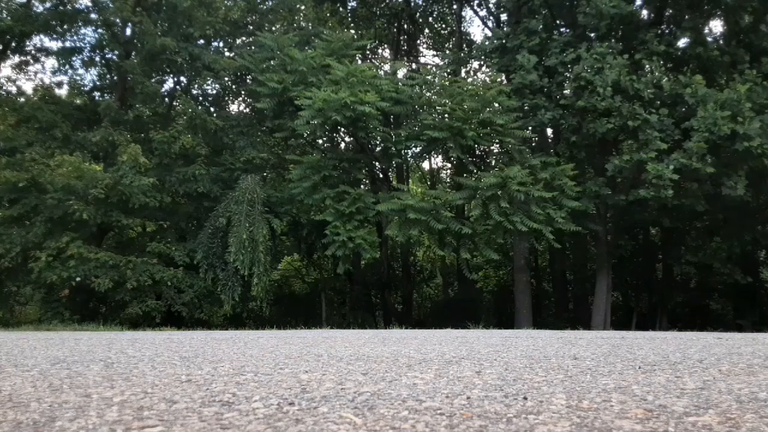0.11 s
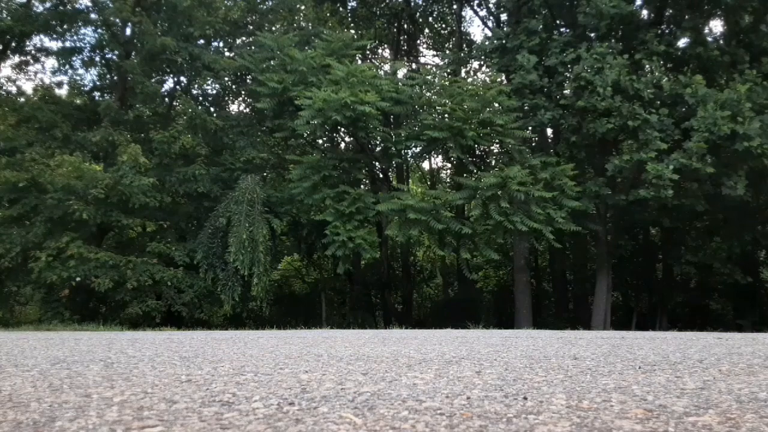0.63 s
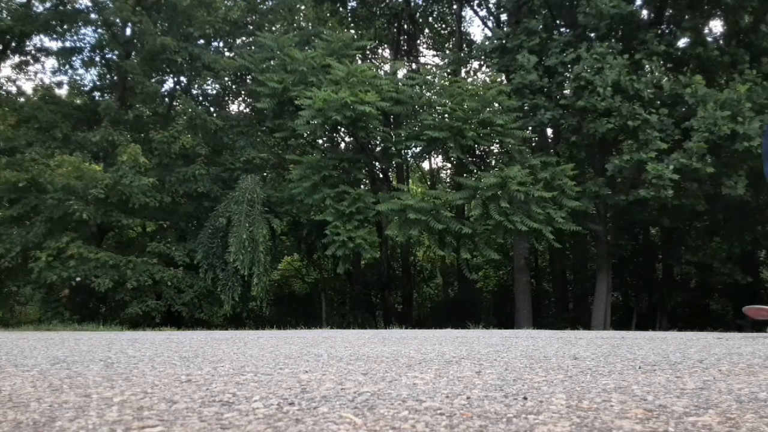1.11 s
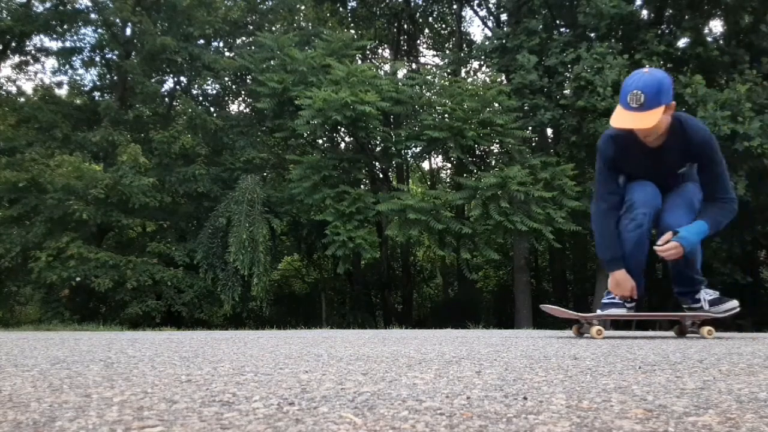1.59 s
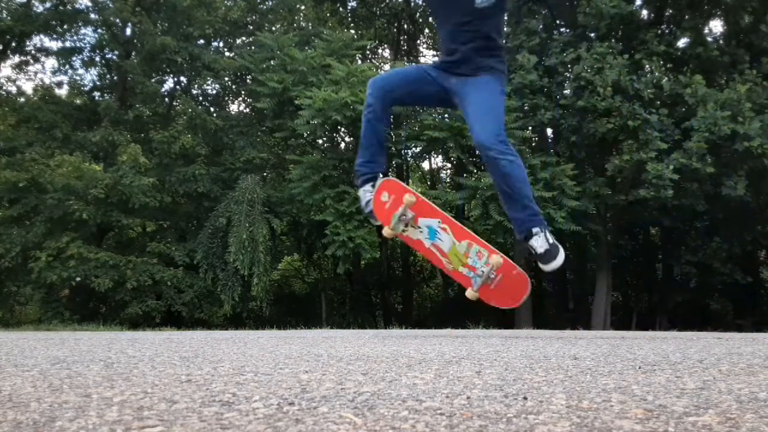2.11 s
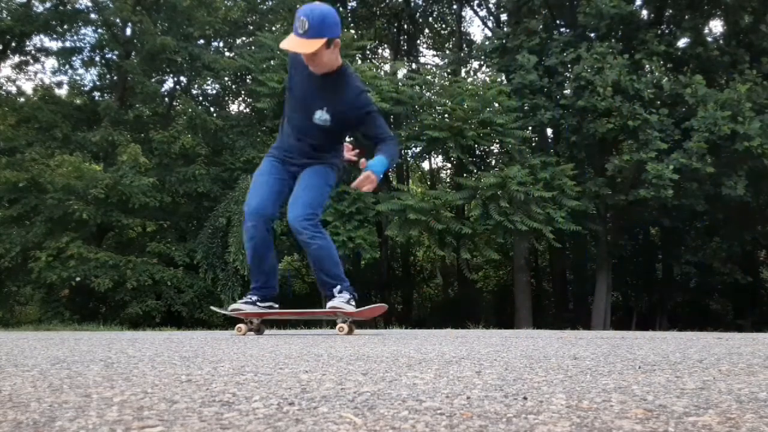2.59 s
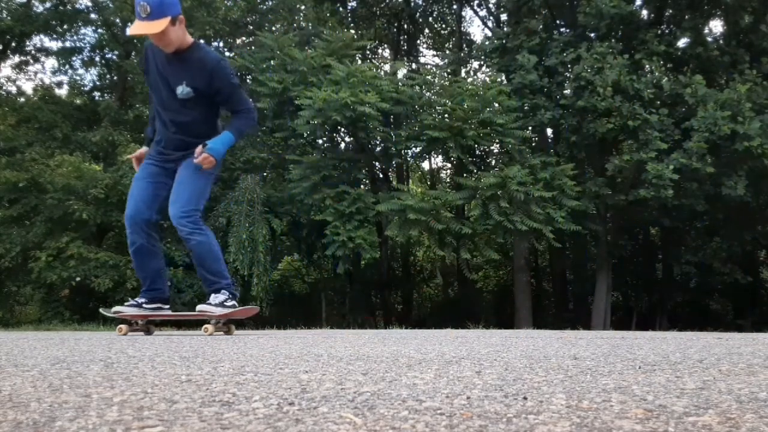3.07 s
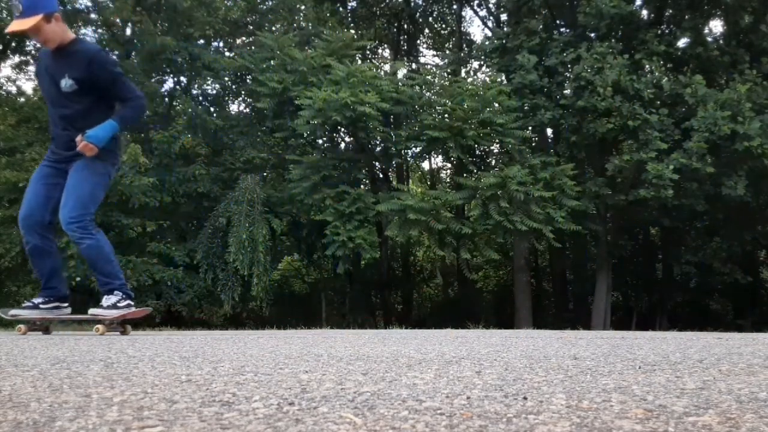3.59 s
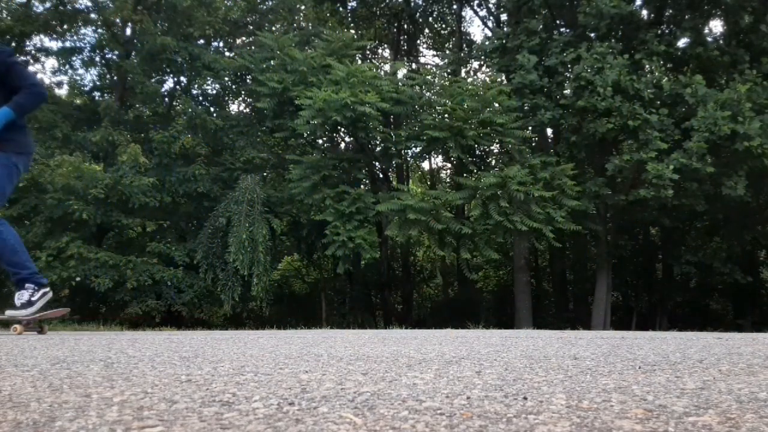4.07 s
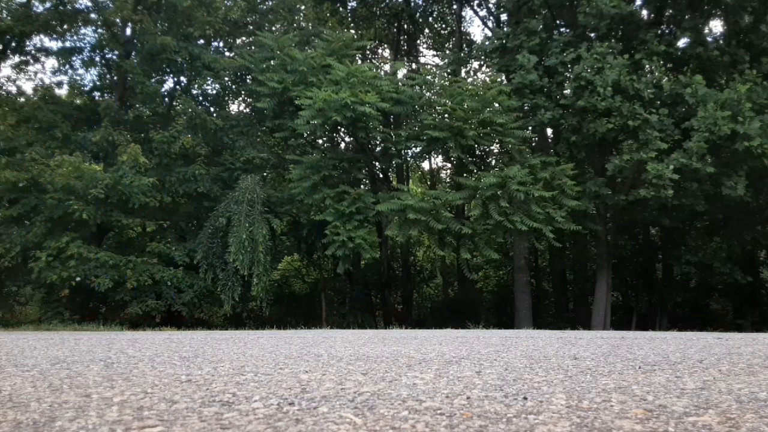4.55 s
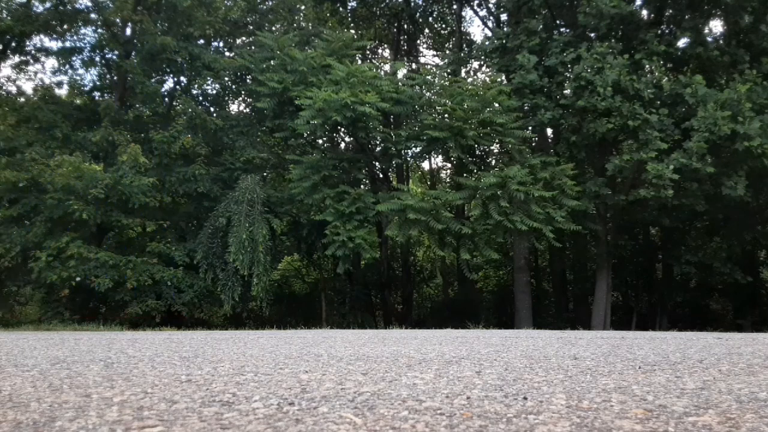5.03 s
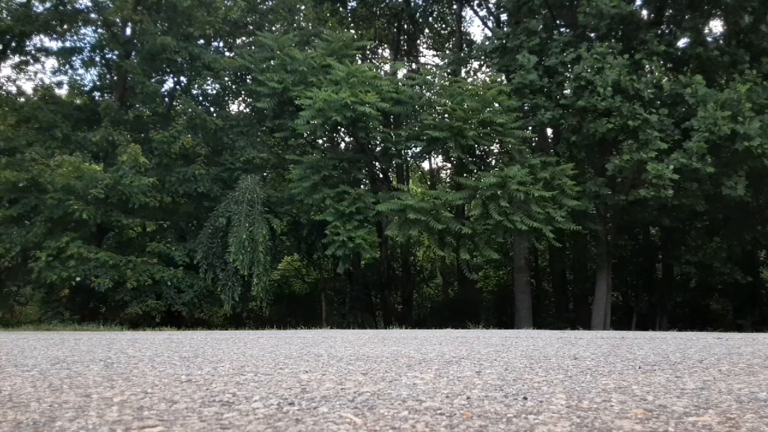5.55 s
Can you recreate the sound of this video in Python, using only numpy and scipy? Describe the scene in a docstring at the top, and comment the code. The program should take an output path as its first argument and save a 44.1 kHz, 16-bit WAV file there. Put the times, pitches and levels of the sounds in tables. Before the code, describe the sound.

A skateboard rattles in over coarse asphalt from the right, pops, is caught and lands with hard wooden cracks, then rolls away left.

```python
"""A skateboard rolls from right to left over coarse asphalt; traffic drone, leaf hiss and a low hum lie below.
Stones shake wheels, deck, trucks and bearings: noise and clicks drive resonances; a loose washer ticks.
Then shoes scuff, the tail pops (decaying deck modes and noise), the board is caught and lands with a push
of air, a short squeak follows, and the board rolls away to the left.
Two microphone ports a hand apart hear it: lag and colour follow the bearing; trees echo it."""
import sys
import numpy as np
from scipy import signal
from scipy.fft import rfft, irfft, next_fast_len
from scipy.io import wavfile
from scipy.ndimage import map_coordinates

SR = 44100
rng = np.random.default_rng(int(sys.argv[2]) if len(sys.argv) > 2 else 0)


def output_pcm(signal):
    """Save a mono or channel-first signal as 16-bit PCM at the path in sys.argv[1].

    Samples are clipped to [-1, 1] before scaling.
    """
    pcm = np.clip(np.atleast_2d(signal).T, -1, 1) * 32767
    wavfile.write(sys.argv[1], SR, np.round(pcm).astype(np.int16))


def boost_factor(decibels):
    """Convert a level in decibels to a linear amplitude factor."""
    exponent = np.asarray(decibels, float) / 20
    return 10 ** exponent


N = 249606

# Wheels on the road: (time [s], shaking [dB], weight on the deck [dB], washer play over shaking [dB])
ROAD = [(0, -28, 9.5, -8), (.2, -38, 11, -3.5), (.3, -39, 10, 3), (.34, -33, 4, 11), (.9, -28.5, 1, -4),
        (1.25, -24.5, 1, -29), (1.4, -30, 5.5, 0), (1.5, -30, 7.5, -6), (1.58, -28.5, 1.5, -4),
        (1.62, -32, 6, -7), (1.8, -30, 5.5, 3.5), (1.95, -33.5, 15, 27.5), (2.03, -50.5, 5, 28),
        (2.12, -48, 15, -26), (2.5, -54, 7, -34), (2.56, -44, 3, -25), (2.72, -39.5, 2.5, -25),
        (2.97, -46, 2.5, -7), (3.6, -48, -4, -15), (3.9, -43, -6, -19), (4, -52, 4, -5),
        (4.04, -41, -10, -3), (4.2, -42, -3, 3), (4.4, -38.5, 5.5, -12), (4.75, -35.5, 1.5, 11),
        (5, -33, 5, 10), (5.15, -33.5, 6, -12), (5.25, -35, 4, -9), (5.66, -37, 0.5, -9)]
# Coarser stretches of road: (middle [s], length [s], extra shaking [dB])
COARSE_PATCHES = [(.45, 0.23, 3), (1.002, 0.35, 2.5), (1.31, .1, 2.5), (1.551, 0.12, 2.5),
                  (1.927, 0.25, 8.5), (4.231, 0.099, 7.5), (4.353, 0.21, 6.5), (4.52, 0.3, 6),
                  (4.725, 0.19, 4.5), (4.939, 0.38, 4.5), (5.145, 0.084, 4.5)]
# Bearing of the board: (time [s], lag of the left port [ms])
BEARING = [(0, 0.38), (.8, 0.34), (1.4, 0.23), (1.9, 0.13), (2.4, -0.017), (3, -0.12), (3.8, -0.19),
           (4.6, -0.25), (5.66, -0.36)]
# Loaded deck favours its upper bending resonances: (time [s], tilt [dB])
LOAD_TILT = [(0, -8.5), (1, -12), (1.2, 2), (1.35, 9), (1.55, 13.5), (1.75, 1), (1.93, -0.5), (2.4, 0),
             (2.8, -3), (3.6, -6), (4.3, -0.5), (4.9, 6), (5.66, -3)]

# Resonances of the board: (centre [Hz], width [Hz], level coming [dB], level going [dB])
RUMBLE_MODES = [(119.8, 21.7, 7, 3.5), (184, 99, 3, -1), (303, 127, -2, 1.5)]
BENDING_MODES = [(499, 101, -1.5, -3), (573, 46.5, 4.5, 4.5), (641, 111, 0.5, 0.5), (790, 136, -3, 0),
                 (860, 71, -3.5, -0.5)]
RINGING_MODES = [(963, 145, 6, 3.5), (1166, 192, 9.5, 6), (1313, 344, 7, 3), (1667, 460, 5.5, -0.5),
                 (1910, 370, 1, -4.5)]
RATTLE_MODES = [(2103, 384, -0.5, 3.5), (2614, 870, -1.5, 3), (3304, 910, -0.5, 2.5), (4250, 814, 1.5, 3.5),
                (4814, 1060, -1, 1.5), (5990, 1290, -3.5, -1), (7540, 1550, -7, -2.5), (8390, 800, -13, -4)]
HISS_MODES = [(8100, 4900, -10.5, -3.5), (10960, 500, -2, 4.5), (13100, 4200, -6, -2),
              (15900, 360, -3, -16)]
WASHER_MODES = [(3650, 470, -47, -6), (4290, 300, 3, -3), (5080, 360, -0.5, -1.5), (5370, 400, -3, -1.5),
                (5800, 320, -7.5, -2.5), (6750, 610, -23, -7)]
BEARING_MODES = [(6160, 500, -3, -6), (7500, 1500, 3, 5)]

# One value per part (rumble, bending, ringing, rattle, hiss): level against the shaking [dB]
PARTS_COMING_DB = [-1.5, 1, -6, 2.5, -6.5]
PARTS_GOING_DB = [-1, -3, -3, 0.5, -8.5]
# Same parts: share of the weight, coarse-stretch and tilt decibels that each follows [dB/dB]
WEIGHT_SHARE = [0.38, 0.64, 0.24, 0, 0.0053]
PATCH_SHARE = [0.36, 0.89, 1.4, 1.47, 1.1]
TILT_SHARE = [-0.06, 0.24, 0.15, 0.024, 0.19]
# Same parts: level against the scuff [dB]
SCUFF_PARTS_DB = [-8.5, -36, -10.5, 1.5, -10]

# A wheel strikes a large stone: (time [s], crack [dB], deck [dB])
JOLTS = [(0.01, -23, -8.5), (0.3244, -22, -24), (0.418, -27, -10), (.44, -33, -9.5), (0.4737, -21, -9.5),
         (0.788, -20, -14), (0.9716, -39, -13), (1.012, -19, -13), (1.087, -15.5, -33), (1.163, -13.5, -3),
         (1.206, -12.5, -3.5), (1.2206, -30, -38), (1.315, -23, -3.5), (1.425, -19, -22), (1.5252, -26, -9),
         (1.699, -39, -9.5), (1.7367, -13.5, -19), (1.76, -33, -19), (1.839, -21, -11), (1.867, -16.5, -28),
         (1.911, -21, -1.5), (1.943, -29, -4), (2.6854, -38, -17), (2.811, -35, -21), (2.95, -44, -35),
         (3.14, -36, -28), (3.181, -37.5, -35), (3.294, -38.5, -29), (3.375, -38, -37), (3.445, -33, -41),
         (3.47, -38, -34), (3.54, -38, -44), (3.695, -30.5, -27), (3.77, -41, -40), (3.789, -37.5, -40),
         (3.846, -42, -37), (3.869, -32, -26), (4.184, -32, -30), (4.23, -37, -16), (4.273, -28, -21),
         (4.305, -29, -30), (4.342, -23, -8.5), (4.445, -43, -15), (4.5, -21, -11), (4.517, -22, -10.5),
         (4.62, -22.5, -25), (4.675, -32, -13), (4.785, -22, -18), (4.8005, -24.5, -10.5),
         (4.848, -29, -15.5), (4.897, -22.5, -19), (5.032, -20.5, -16), (5.075, -21, -19), (5.22, -26, -25),
         (5.3235, -27, -24), (5.385, -26.5, -22)]
# Jolt on the deck: (bending against deck [dB], ringing against deck [dB])
JOLT_COMING_DB = [-10, -34]
JOLT_GOING_DB = [-15.5, -9]
# A wheel drops hard, one deck note: (time [s], start level [dB], pitch [Hz], t60 [s])
THUDS = [(0.01, -17.5, 597, 0.04), (0.437, -13, 500, 0.016), (0.474, -12.5, 580, 0.017),
         (0.788, -15, 600, 0.032), (1.01, -14.5, 600, 0.035), (1.091, -15, 510, 0.025),
         (1.163, -16, 484, 0.033), (1.209, -24, 620, 0.021), (1.251, -20, 510, 0.042),
         (1.315, -13.5, 765, 0.03), (1.525, -7.5, 790, 0.016), (1.564, -22, 754, 0.025),
         (1.748, -18, 588, 0.094), (1.836, -7, 596, 0.064), (1.908, -9, 505, 0.03),
         (1.942, -6.5, 531, 0.049), (4.229, -25, 910, 0.043), (4.308, -21, 1200, 0.023),
         (4.345, -17, 1050, 0.018), (4.4458, -27, 1110, 0.021), (4.495, -23, 408, 0.053),
         (4.62, -20, 1020, 0.025), (4.675, -25, 900, 0.022), (4.786, -20, 1080, 0.046),
         (4.799, -22, 675, 0.034), (4.911, -19, 674, 0.035), (5.032, -22, 409, 0.028),
         (5.219, -33, 433, 0.025), (5.322, -34, 353, 0.025), (5.383, -22.5, 735, 0.032)]
# Notes of the deck under small stones: (pitch [Hz])
KNOCK_HZ = [330, 480, 620, 800, 1050, 1250]
# Spinning bearings: (time [s], level [dB])
SIZZLE = [(0, -63), (.3, -63), (1.9, -47), (2.1, -75), (2.5, -80), (2.6, -54), (3, -56), (3.8, -58),
          (4.2, -63), (5.66, -60)]
# Clearest ticks of the washer: (time [s], start level [dB])
CLEAR_TICKS = [(1.341, -25), (1.3877, -30), (1.3992, -22.5), (1.4256, -27), (1.4431, -25), (1.4555, -23),
               (1.47, -29), (1.4925, -30), (1.5114, -26), (1.5404, -26), (1.5614, -23), (1.602, -23),
               (1.618, -20.5), (1.6314, -31), (1.6465, -22), (1.6744, -23.5), (1.686, -32), (1.703, -22.5),
               (1.7144, -39), (1.7579, -19), (1.784, -24), (1.8233, -25), (1.8487, -17), (1.9455, -13),
               (1.958, -14), (1.9884, -24), (1.9994, -20), (4.024, -29.5), (4.047, -33), (4.0646, -27),
               (4.077, -30), (4.0894, -42), (4.1061, -33), (4.121, -27), (4.131, -25.5), (4.1664, -43),
               (4.1844, -32), (4.1984, -32), (4.214, -28), (4.2244, -29), (4.237, -24), (4.2647, -34),
               (4.2727, -28), (4.285, -25), (4.2964, -28), (4.3061, -27), (4.3241, -22), (4.338, -25)]
# Shoes drag over the grip tape: (start [s], end [s], level [dB])
SCUFFS = [(1.953, 2.121, -31), (2.126, 2.173, -29.5), (2.18, 2.25, -46), (2.39, 2.539, -34),
          (2.544, 2.657, -34.5)]
# Tail pop, catch, landing: (time [s], crack [dB], deck bending [dB], deck ringing [dB], nominal t60 [s])
BLOWS = [(2.0672, -10.5, -23, -12.5, 0.077), (2.3907, -13, -23, -15, 0.025),
         (2.4112, -28, -25.5, -32, 0.064), (2.485, -8, -16, -20, 0.059), (2.49, -14.5, -24, -5, 0.025),
         (2.5121, -11, -11, -10, 0.033), (2.5223, -19, -26, -12, 0.016)]
# Clean strikes on the deck: (time [s], low group [dB], middle group [dB], high group [dB])
STRIKES = [(2.0664, -21, -14.5, -27), (2.0693, -19, -13.5, -19.5), (2.391, -12.5, -18.5, -17.5),
           (2.4105, -29, -36, -40), (2.426, -27, -39, -41), (2.4868, -14.5, -27, -20),
           (2.4906, -8.5, -14, -18), (2.5125, -7, -20, -23), (2.5205, -7, -18, -25)]
# Modes of the struck deck: (pitch [Hz], level in group [dB], t60 [s], group [index])
DECK_MODES = [(571, -2, 0.049, 0), (818, -3, 0.036, 0), (1050, -9, .05, 1), (1153, 0.5, .045, 1),
              (1670, -0.5, 0.028, 2), (1995, -4.5, 0.037, 2), (2510, -0.5, 0.021, 2)]

# Traffic and leaves, relative spectrum: (frequency [Hz], density [dB])
FAR_SPECTRUM = [(18, -52), (30, -30), (48, -42), (95, -2), (184, 4.5), (259, -2), (426, -6.5), (554, -14.5),
                (866, -14), (962, -18), (2170, -14), (12600, -74), (16000, -53.5)]
# Low hum: (time [s], pitch [Hz], level [dB])
HUM = [(0, 59, -50), (.8, 61.2, -47), (1.4, 61.1, -49), (2, 62, -55), (3, 63.8, -66), (5.66, 64, -60)]
# Echoes from the trees: (delay [s], level [dB])
TREES = [(0.023, -24), (0.052, -22.5), (0.087, -17.5), (0.129, -20.5), (0.172, -23)]
# Shading by the microphone body, board on the right / left: (frequency [Hz], left minus right [dB])
SHADE_COMING = [(60, -4), (110, 0), (200, 2.5), (380, 0), (700, 1.5), (1290, 5.5), (2380, 2), (4400, 1.5),
                (8120, -7.5), (15000, -2.5)]
SHADE_GOING = [(60, -7), (110, 1), (200, 1.5), (380, 1.5), (700, 4), (1290, 8.5), (2380, 5), (4400, 8.5),
               (8120, 6), (15000, -2)]
# The ports differ in build: (frequency [Hz], lead of the left port [rad])
PORT_LEAD = [(200, 0.15), (500, 0.3), (900, 0.6), (1400, 0.15), (2200, 0.3)]

FAR_BALANCE_DB, FAR_ALIKE_HZ = 3, 900  # left over right; ports alike below
AIR_DB, TRAFFIC_DB = -48.5, -50.5
THRUM_DB, THRUM_FOLLOWS = -46, 0.48  # level at mean shaking plus weight; share of its swing
SMOOTHER_GOING = .45  # share by which the stones even out as the board rolls away
GRIT_PER_S, GRIT_SPREAD_DB, GRIT_DB = 450, 6.0, -5.0  # level against the shaking
KNOCKS_PER_S, KNOCK_CYCLES = 110, 7.0  # cycles to fall 60 dB
KNOCK_COMING_DB, KNOCK_GOING_DB = -9, -8.5  # against the shaking
TICK_T60_S, TICK_SNAP_DB = .016, 13  # snap: first contact of a clear tick, above its rattle
JOLT_T60_S = 0.047
CHIP_DB, CHIP_HZ, CHIP_WIDTH_HZ = 3, 2400, 5100  # click of a jolt, against its crack
SCUFF_EDGE_S = 0.024
STRIKE_RISE_S = .0004
SNAP_DB, SNAP_T60_S = 0, 0.0056  # hard first contact of a blow, against its body
SLAM_S, SLAM_DB, SLAM_LENGTH_S = 2.516, -11.5, 0.0051
SQUEAK_S, SQUEAK_LENGTH_S, SQUEAK_DB = 2.628, .06, -36
SQUEAK_HZ, SQUEAK_WIDTH_HZ = 1620, 200


def rms_one(x):
    """Scales to rms 1."""
    return x / np.sqrt(np.mean(x ** 2) + 1e-20)


def in_time(rows):
    """Interpolates the columns of a table sample by sample."""
    s, *columns = np.transpose(rows)
    return [np.interp(np.arange(N) / SR, s, c) for c in columns]


def band(order, edge_hz, kind, x):
    """Butterworth filter."""
    return signal.sosfilt(signal.butter(order, edge_hz, kind, fs=SR, output="sos"), x)


def coloured(x, points, share=1, lead=0):
    """Applies a share of a smooth (Hz, dB) spectrum and a share of the port phase lead."""
    size = next_fast_len(N)
    log_hz = np.log(np.arange(size // 2 + 1) * SR / size + 1)
    hz, level_db = np.transpose(points)
    lead_hz, lead_rad = np.transpose(PORT_LEAD)
    gain = boost_factor(share * np.interp(log_hz, np.log(hz), level_db))
    turn = np.exp(1j * lead * np.interp(log_hz, np.log(lead_hz), lead_rad))
    return irfft(rfft(x, size) * gain * turn, size)[..., :N]


def fading(x, t60_s):
    """Each click leaves an envelope that falls 60 dB in t60_s."""
    return signal.lfilter([1], [1, -boost_factor(-60 / (t60_s * SR))], x + 1e-18)


def random_clicks(per_s, spread_db, limit):
    """Clicks at random times, of random sign and uneven size."""
    sizes = boost_factor(spread_db * np.minimum(rng.exponential(1, N), limit))
    return sizes * rng.choice([-1, 1], N) * (rng.random(N) < per_s / SR)


def stones(per_s, spread_db, t60_s, bed):
    """Random stones of uneven size over the even grain of the road; rms 1."""
    sizes = boost_factor(spread_db * np.minimum(rng.exponential(1, N), 2.5))
    hits = fading(sizes * (rng.random(N) < per_s / SR), t60_s)
    return rms_one(np.hypot(rms_one(hits), bed))


def three(alike):
    """White noise common to both ports, then one for each port's own share."""
    alike = np.clip(alike, 0, 1) * np.ones(N)
    return rng.standard_normal((3, N)) * np.sqrt([alike, 1 - alike, 1 - alike])


def body(force, modes, going, loose=0, tilt_db=0):
    """Parallel resonances, rms 1 for white force; levels follow the bearing, loose parts chatter apart."""
    out, power = 0, 0
    own = np.ones(N)
    if loose:
        own = rms_one(stones(per_s=110, spread_db=7.0, t60_s=0.072, bed=0.42) ** loose)
    for k, (hz, width_hz, coming_db, going_db) in enumerate(modes):
        r = np.exp(-np.pi * width_hz / SR)
        gain = boost_factor(coming_db) * (1 - going) + boost_factor(going_db) * going
        gain = gain * boost_factor(tilt_db * (k / len(modes) - .5))
        drive = force * np.roll(own, k * N // len(modes))
        poles = [1, -2 * r * np.cos(2 * np.pi * hz / SR), r * r]
        ring = signal.lfilter([(1 - r * r) / 2, 0, (r * r - 1) / 2], poles, drive)
        out = out + (-1) ** k * gain * ring
        power = power + gain ** 2 * (1 - r * r) / 2
    return out / np.sqrt(power)


def far_sides():
    """Gains that set the background louder on the left."""
    return boost_factor([[FAR_BALANCE_DB / 2], [-FAR_BALANCE_DB / 2]])


def far(shaking_db):
    """Noise as traffic drone, wheel thrum and leaf hiss, alike at both ports only in the bass."""
    common, *own = rng.standard_normal((3, N))
    air = band(1, FAR_ALIKE_HZ, "low", common) + band(1, FAR_ALIKE_HZ, "high", own)
    drone = band(2, [55, 92], "band", common)
    thrum = boost_factor(THRUM_DB + THRUM_FOLLOWS * (shaking_db - shaking_db.mean()))
    drone_level = np.hypot(boost_factor(TRAFFIC_DB), thrum)
    return far_sides() * (boost_factor(AIR_DB) * rms_one(coloured(air, FAR_SPECTRUM)) + drone_level * rms_one(drone))


def hum():
    """A sine of slowly drifting low pitch, louder on the left."""
    hz, level_db = in_time(HUM)
    tone = np.sqrt(2) * boost_factor(level_db) * np.sin(2 * np.pi * (np.cumsum(hz) / SR + rng.random()))
    return tone * far_sides()


def road():
    """Shaking, extra shaking on the coarse stretches, weight and washer play."""
    shaking_db, weight_db, play_db = in_time(ROAD)
    t = np.arange(N) / SR
    coarse_db = np.zeros(N)
    for s, length_s, db in COARSE_PATCHES:
        coarse_db += db * np.cos(np.pi * np.clip((t - s) / length_s, -.5, .5)) ** 2
    return shaking_db, coarse_db, weight_db, play_db


def rolling(going, shaking_db, coarse_db, weight_db, tilt_db):
    """Forces on the five parts: the same stones shake all, metal chatters in shorter bursts."""
    shake = stones(per_s=150, spread_db=4.5, t60_s=0.025, bed=1.3) ** (1 - SMOOTHER_GOING * going)
    chatter = shake ** .5 * stones(per_s=400, spread_db=3.0, t60_s=0.011, bed=0.89)
    grain = [shake ** .4, shake, shake * chatter ** .3, chatter, chatter ** .9]
    parts_db = np.outer(PARTS_COMING_DB, 1 - going) + np.outer(PARTS_GOING_DB, going)
    parts_db += np.outer(WEIGHT_SHARE, weight_db) + np.outer(PATCH_SHARE, coarse_db)
    parts_db += np.outer(TILT_SHARE, tilt_db)
    return boost_factor(shaking_db + parts_db) * grain


def sizzle(going):
    """Spinning bearings: noise through two treble resonances."""
    level_db, = in_time(SIZZLE)
    return body(boost_factor(level_db) * three(0.55), BEARING_MODES, going)


def grit(going, shaking_db):
    """Lone grains click against the trucks and excite the rattle resonances."""
    clicks = rms_one(random_clicks(GRIT_PER_S, GRIT_SPREAD_DB, 3))
    return body(boost_factor(shaking_db + GRIT_DB) * clicks, RATTLE_MODES, going)


def knocks(going, shaking_db):
    """Small stones rap the deck at random; each rap is a brief wooden note."""
    clicks = random_clicks(KNOCKS_PER_S, 6.0, 2.5)
    dealt, out = rng.integers(0, len(KNOCK_HZ), N), 0
    for k, hz in enumerate(KNOCK_HZ):
        r, w = boost_factor(-60 * hz / (KNOCK_CYCLES * SR)), 2 * np.pi * hz / SR
        raps = clicks * (dealt == k) + 1e-18
        out = out + signal.lfilter([0, np.sin(w)], [1, -2 * r * np.cos(w), r * r], raps)
    return boost_factor(shaking_db + KNOCK_COMING_DB * (1 - going) + KNOCK_GOING_DB * going) * rms_one(out)


def washer(per_s, jitter, t60_s):
    """A loose washer ticks at a nearly steady rate, with uneven strength."""
    draws = rng.standard_normal((N * 150 // SR, 2))
    at = np.cumsum(SR / per_s * np.exp(jitter * draws[:, 0])).astype(int)
    ticks = np.zeros(N)
    ticks[at[at < N]] = boost_factor(2.0 * np.clip(draws[at < N, 1], -2, 1))
    return fading(ticks, t60_s)


def washer_ticks(going, level_db):
    """Steady and clear ticks as noise bursts through the washer resonances; clear ones start with a snap."""
    s, db = np.transpose(CLEAR_TICKS)
    clear = np.zeros(N)
    clear[(s * SR).astype(int)] = boost_factor(db)
    steady = boost_factor(level_db) * washer(per_s=70, jitter=.2, t60_s=0.014)
    force = np.hypot(steady, fading(clear, TICK_T60_S)) * three(0.85)
    force[0] += boost_factor(TICK_SNAP_DB) * clear
    return body(force, WASHER_MODES, going)


def jolt_clicks():
    """Each jolt begins with one dry, strongly damped click."""
    out, age_s = np.zeros(N + SR), np.arange(SR // 8) / SR
    click = boost_factor(CHIP_DB) * np.exp(-np.pi * CHIP_WIDTH_HZ * age_s) * np.cos(2 * np.pi * CHIP_HZ * age_s)
    for (s, crack_db, _), sign in zip(JOLTS, rng.choice([-1, 1], len(JOLTS))):
        i = round(s * SR)
        out[i:i + len(age_s)] += sign * boost_factor(crack_db) * click
    return out[:N]


def blows(going):
    """Jolts and blows: rough forces that start at once and die fast, faster in the treble."""
    force, jolts = np.zeros((5, N)), []
    for s, crack_db, deck_db in JOLTS:
        away = going[round(s * SR)]
        deck_parts_db = deck_db + (1 - away) * np.array(JOLT_COMING_DB) + away * np.array(JOLT_GOING_DB)
        jolts.append((s, crack_db, *deck_parts_db, JOLT_T60_S))
    age_s = np.arange(SR // 8) / SR
    snap = 1 + boost_factor(SNAP_DB - 60 * age_s / SNAP_T60_S)
    speed = np.array([[.8], [.7], [.9], [1.2], [1.8]])  # decay of each part against the nominal t60
    for s, crack_db, bending_db, ringing_db, t60_s in BLOWS + jolts:
        i = round(s * SR)
        levels_db = np.array([[bending_db - 6.0], [bending_db], [ringing_db], [crack_db], [crack_db - 15.0]])
        force[:, i:i + len(age_s)] += boost_factor(levels_db - 60 * age_s / t60_s * speed) * snap
    return force


def thuds():
    """Each thud is one damped deck note that starts at once."""
    out, age_s = np.zeros(N + SR), np.arange(SR // 8) / SR
    for s, db, hz, t60_s in THUDS:
        i = round(s * SR)
        out[i:i + len(age_s)] += boost_factor(db - 60 * age_s / t60_s) * np.sin(2 * np.pi * hz * age_s)
    return out[:N]


def scuffs():
    """A dragging shoe rasps evenly, mostly in the rattle part."""
    t = np.arange(N) / SR
    drag = np.zeros(N)
    for start, end, db in SCUFFS:
        drag += boost_factor(db) * np.clip(np.minimum(t - start, end - t) / SCUFF_EDGE_S + .5, 0, 1)
    return np.outer(boost_factor(SCUFF_PARTS_DB), drag)


def strikes():
    """Each strike sets the modes of the deck ringing as decaying sines."""
    out, age_s = np.zeros(N + SR), np.arange(SR // 8) / SR
    rise = np.minimum(age_s / STRIKE_RISE_S, 1)
    for s, *group_db in STRIKES:
        i = round(s * SR)
        for hz, db, t60_s, group in DECK_MODES:
            decay = boost_factor(group_db[int(group)] + db - 60 * age_s / t60_s)
            out[i:i + len(age_s)] += decay * np.sin(2 * np.pi * hz * age_s) * rise
    return out[:N]


def slam():
    """The full weight lands: one smooth push of air."""
    out = np.zeros(N)
    i, push = round(SLAM_S * SR), np.hanning(round(SLAM_LENGTH_S * SR))
    out[i:i + len(push)] = boost_factor(SLAM_DB) * push
    return out


def squeak(going):
    """A short blurred squeak after the landing: narrow-band noise that swells and fades."""
    out = np.zeros(N)
    i, swell = round(SQUEAK_S * SR), np.hanning(round(SQUEAK_LENGTH_S * SR)) ** 2
    tone = body(rng.standard_normal(N), [(SQUEAK_HZ, SQUEAK_WIDTH_HZ, 0, 0)], going)
    out[i:i + len(swell)] = boost_factor(SQUEAK_DB) * swell * tone[i:i + len(swell)]
    return out


def board(going, shaking_db, coarse_db, weight_db, play_db):
    """Rolling, scuffs and blows drive the same resonances; the treble is less alike at the two ports."""
    tilt_db, = in_time(LOAD_TILT)
    dragged = np.hypot(rolling(going, shaking_db, coarse_db, weight_db, tilt_db), scuffs())
    rumble, bending, ringing, rattle, hiss = np.hypot(dragged, blows(going))
    sound = body(rumble * three(0.95), RUMBLE_MODES, going, tilt_db=0.77 * weight_db)
    sound += body(bending * three(0.98), BENDING_MODES, going, tilt_db=tilt_db)
    sound += body(ringing * three(1.0), RINGING_MODES, going)
    sound += body(rattle * three(0.78 - 0.2 * going), RATTLE_MODES, going, loose=0.29)
    sound += body(hiss * three(0.023), HISS_MODES, going)
    sound += sizzle(going) + washer_ticks(going, shaking_db + play_db)
    rough_db = shaking_db + coarse_db
    sound[0] += grit(going, rough_db) + knocks(going, rough_db + weight_db / 2)
    sound[0] += jolt_clicks() + thuds() + strikes() + slam() + squeak(going)
    return sound


def ports(sound, lag_ms, going):
    """The nearer port hears the board first; shading by the microphone body follows the bearing."""
    both, out = sound[0] + sound[1:], np.zeros((2, N))
    for k, half in enumerate((.5, -.5)):
        heard = map_coordinates(both[k], [np.arange(N) - half * lag_ms * SR / 1000], order=3)
        out[k] = (1 - going) * coloured(heard, SHADE_COMING, half, half)
        out[k] += going * coloured(heard, SHADE_GOING, half, half)
    return out


def trees(x):
    """A few smeared echoes from the trunks, which scatter the middle pitches best."""
    out = np.zeros((2, N))
    for s, db in TREES:
        i, smear = round(s * SR), rng.standard_normal((2, 1500)) * np.hanning(1500) / 24
        out[:, i:] += boost_factor(db) * signal.fftconvolve(x[None], smear, axes=1)[:, :N - i]
    return band(2, [800, 6000], "band", out)


def scene():
    """Board, echoes and background."""
    lag_ms, = in_time(BEARING)
    going = np.clip(.55 - 1.7 * lag_ms, 0, 1)  # 0 = coming on the right, 1 = going on the left
    shaking_db, coarse_db, weight_db, play_db = road()
    sound = board(going, shaking_db, coarse_db, weight_db, play_db)
    return ports(sound, lag_ms, going) + trees(sound[0]) + far(shaking_db + weight_db) + hum()


def top_cut(x):
    """Nothing passes above the cut-off."""
    return signal.sosfilt(signal.butter(12, 16470, fs=SR, output="sos"), x)


def record(dry):
    """Bass is cut, peaks are rounded, the top is cut steeply."""
    x = band(5, 57, "high", dry)
    rounded = 1.5 * np.tanh(x / 1.5)
    mix = signal.sosfilt(signal.cheby2(16, 35, 15850, fs=SR, output="sos"), rounded)
    return top_cut(mix)


dry = scene()
out = record(dry)
output_pcm(out)
```